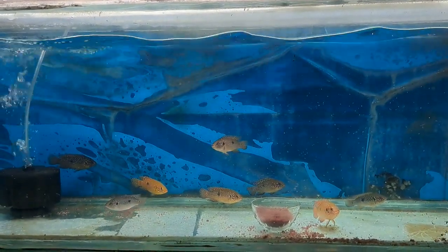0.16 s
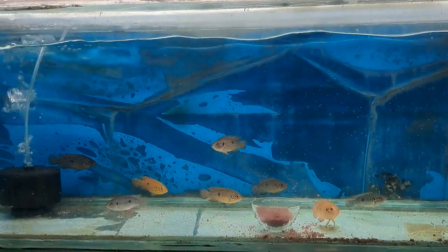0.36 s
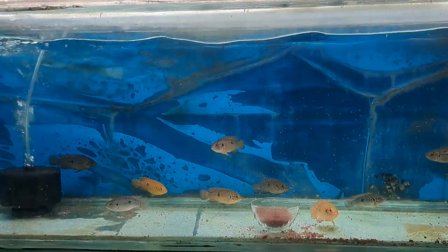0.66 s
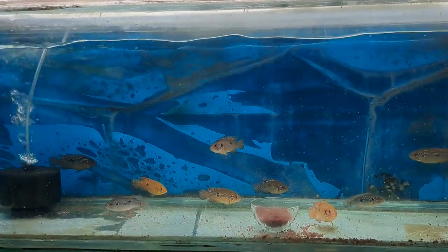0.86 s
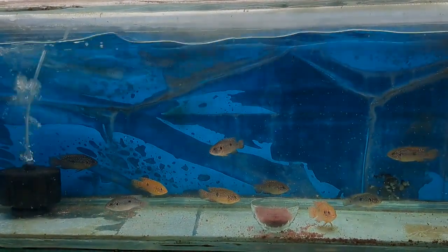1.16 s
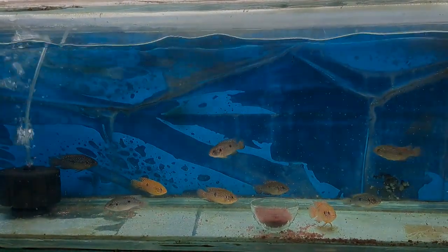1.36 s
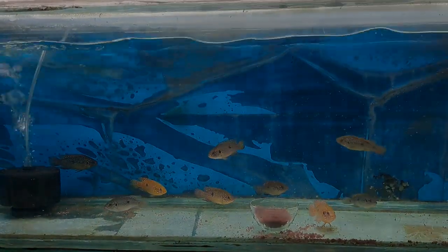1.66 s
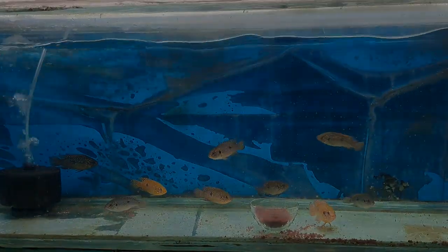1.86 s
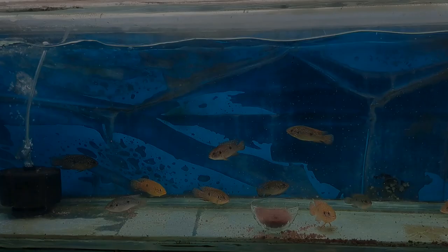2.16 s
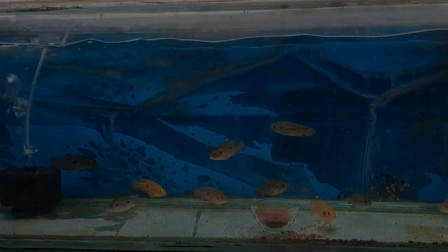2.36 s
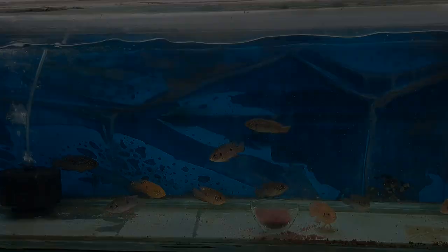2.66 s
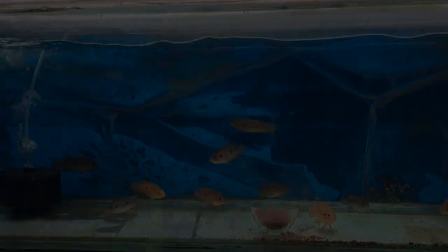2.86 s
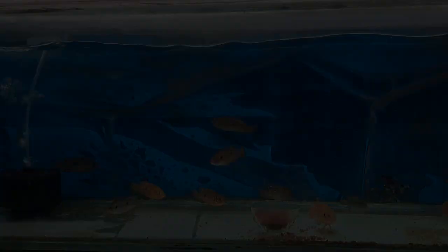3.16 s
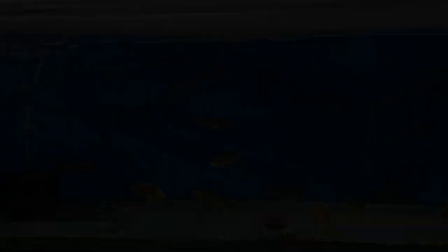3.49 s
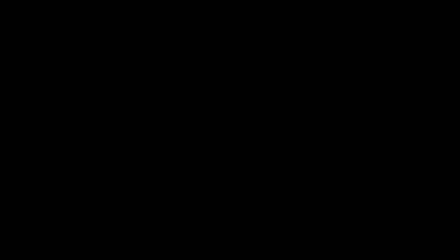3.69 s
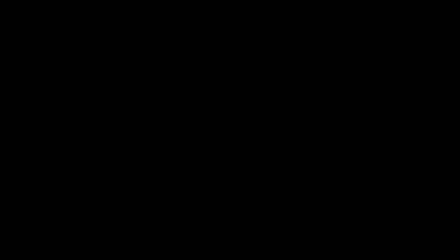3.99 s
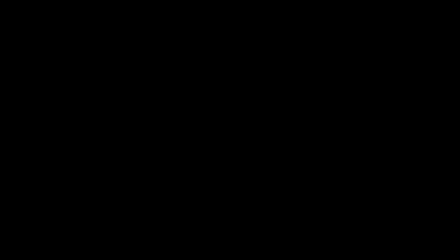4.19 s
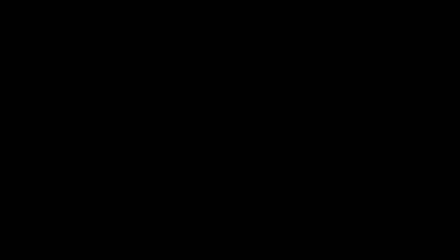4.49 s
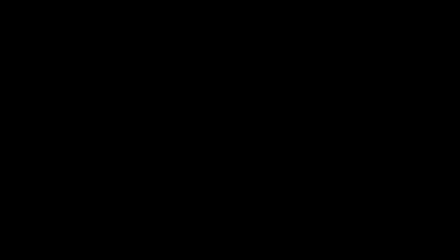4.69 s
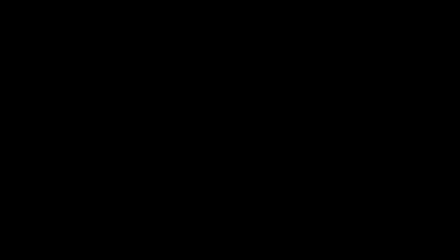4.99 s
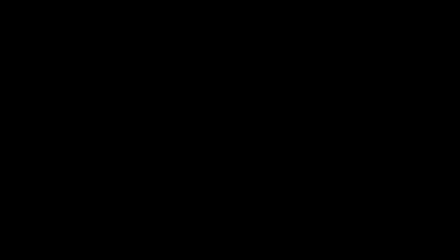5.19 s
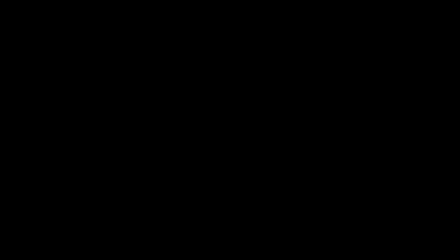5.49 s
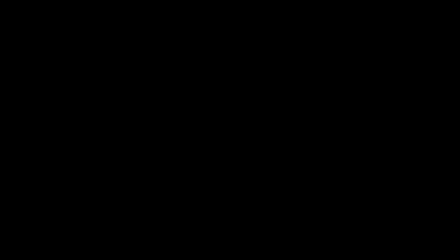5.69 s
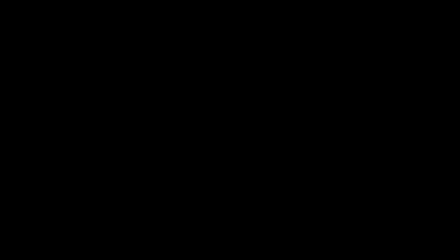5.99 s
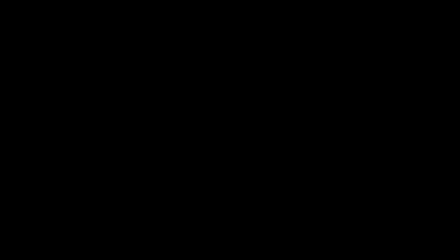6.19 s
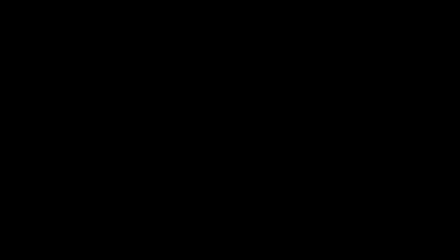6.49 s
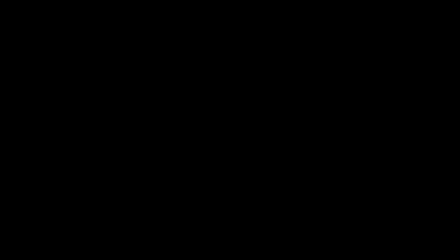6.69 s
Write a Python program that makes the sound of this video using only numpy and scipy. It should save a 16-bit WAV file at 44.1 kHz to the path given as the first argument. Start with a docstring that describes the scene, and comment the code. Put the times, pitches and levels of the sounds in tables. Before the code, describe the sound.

Air bubbles gurgle and splash at an aquarium's surface in uneven surges, popping and puffing close to the microphone, then calming in a quiet room.

```python
"""Aquarium in a quiet room: air from a sponge filter breaks at the surface, close to a stereo microphone.
Large bubbles gurgle all the time; again and again the water surges and splashes in small bubbles and spray.
Each bubble is a decaying sine of rising pitch; the finest foam is shaped noise. Single pops and ticks join in.
The biggest bursts puff air at the microphone, and large air pockets glug.
Random echoes give the glass tank a short ring and the room a longer, duller one."""
import sys
import numpy as np
from scipy import signal
from scipy.fft import rfft, irfft
from scipy.io import wavfile
from scipy.ndimage import uniform_filter1d

SR = 44100
rng = np.random.default_rng(int(sys.argv[2]) if len(sys.argv) > 2 else 0)


def waveform_to_disk(signal):
    """Save audio, clipped to [-1, 1], as 16-bit WAV at the path in sys.argv[1]."""
    frames = np.transpose(np.atleast_2d(signal))
    scaled = np.clip(frames, -1, 1) * 32767
    samples = np.round(scaled).astype(np.int16)
    wavfile.write(sys.argv[1], SR, samples)


N = 302085   # length [samples]


def from_db(db):
    """Decibels to amplitude gain."""
    return 10 ** (np.asarray(db) / 20)


def in_time(rows):
    """Each column of a (time, value, ...) curve at every sample."""
    s, *columns = np.transpose(rows)
    return [np.interp(np.arange(N) / SR, s, column) for column in columns]


def at_hz(points, hz):
    """Read a spectrum on a log-frequency axis."""
    known, level = np.transpose(points)
    return np.interp(np.log(hz + 1e-9), np.log(known), level)


def panned(pan_db):
    """Left and right gains of constant total power; positive is left."""
    gains = from_db(np.array([[.5], [-.5]]) * pan_db)
    return gains / np.sqrt(np.mean(gains ** 2, axis=0))


def add(out, s, sound):
    """Mix a short stereo sound in at time s."""
    start = min(max(int(s * SR), 0), N)
    out[:, start:start + sound.shape[1]] += sound[:, :N - start]


def noise(spectrum):
    """Coloured noise, unrelated in the two channels; rms 1."""
    white = rfft(rng.standard_normal((2, N)))
    hz = np.arange(white.shape[1]) * SR / N
    coloured = irfft(white * from_db(at_hz(spectrum, hz)), N)
    return coloured / coloured.std()


def clusters(per_s):
    """Bubbles reach the surface in uneven bunches: a random swing of spread near 1, per_s knots a second."""
    knots = rng.standard_normal(2000)
    swing = np.interp(np.arange(N) / SR * per_s, np.arange(len(knots)), knots)
    return np.sqrt(3 / 2) * swing   # interpolation had narrowed the spread


def scattered(count):
    """Random times [samples], one in each of count equal slots: the air supply is even; and random sizes 0..1."""
    when, size = rng.random((count, 2)).T
    return (np.arange(count) + when) / count * (N - 1), size


def pitches_of(sizes, size):
    """Spread sizes 0..1 evenly in octaves over the pitch range of a table."""
    return sizes[0][0] * (sizes[-1][0] / sizes[0][0]) ** size


# the still room: (frequency [Hz], relative density [dB per Hz])
ROOM_TONE_SPECTRUM = [(15, 12.5), (60, 6), (300, -2), (1500, -15.5), (4000, -24), (10000, -21),
                      (20000, -54)]


def room_tone(level_db=-79.5):
    """Steady, mostly low noise of the still room."""
    return from_db(level_db) * noise(ROOM_TONE_SPECTRUM)


def echoes(x, t60, wet_db, dull_hz, crossover):
    """Dense dying reflections, steeply dulled so that snaps stay dry; a share of each side crosses over."""
    t = np.arange(SR // 2) / SR
    first_echo_s = .002
    tail = rng.standard_normal((2, len(t))) * from_db(-60 * t / t60) * (t > first_echo_s)
    tail /= np.sqrt(np.sum(tail ** 2, axis=1, keepdims=True))
    tail = signal.sosfilt(signal.butter(4, dull_hz, fs=SR, output="sos"), tail)
    crossed = x + crossover * x[::-1]
    return from_db(wet_db) * signal.oaconvolve(crossed, tail, axes=1)[:, :N]


def eddies(puff_eddy_db=-34, glug_eddy_db=-12.0, fall_db_per_s=154.5):
    """Stereo gain of the air that swirls on after each puff and each glug, dying exponentially."""
    out = np.zeros((2, N))
    dying = from_db(-fall_db_per_s * np.arange(SR // 2) / SR)
    for s, peak_db, _, pan_db in AIR_PUFFS:
        add(out, s, from_db(peak_db + puff_eddy_db) * dying * panned(pan_db))
    for s, peak_db, _, _, pan_db in POCKET_GLUGS:
        add(out, s, from_db(peak_db + glug_eddy_db) * dying * panned(pan_db))
    return out


# air stirred at the microphone: (frequency [Hz], relative density [dB per Hz])
STIRRED_AIR_SPECTRUM = [(10, -7.5), (25, 2.5), (60, -1), (130, -6.5), (190, 2), (300, -48), (700, -17.5)]


def stirred_air(level_db, draught_db=-11, lumps_db=1.5):
    """A low, lumpy draught from the bursting surface reaches the microphone, with the eddies."""
    lumps = lumps_db * np.tanh(clusters(per_s=51))
    draught = from_db(level_db + draught_db + lumps) * panned(2.2)
    air = noise(STIRRED_AIR_SPECTRUM) * (draught + eddies())
    return signal.sosfilt(signal.butter(2, 1200, fs=SR, output="sos"), air)


# low glugs of large air pockets:
# (time of full swing [s], peak [dB], pitch at full swing [Hz], half length [s], left-right [dB])
POCKET_GLUGS = [(3.352, -21.5, 157, 0.0042, 27), (3.388, -35, 137, 0.015, 14),
                (3.418, -35, 157.3, 0.0097, 20), (3.523, -37, 118, 0.0086, 29),
                (3.673, -39.5, 210, 0.0067, -1), (4.574, -38.5, 126, 0.0061, 30),
                (5.953, -51, 292, 0.013, -2), (6.003, -49, 224, 0.0085, 2)]


def glugs(rise_octaves_per_s=20.0):
    """A large pocket wobbles for a few slow cycles, swelling and fading, its pitch rising as it drains."""
    out = np.zeros((2, N))
    t = np.arange(-SR // 20, SR // 20) / SR
    for s, peak_db, hz, half_s, pan_db in POCKET_GLUGS:
        phase = 2 * np.pi * np.cumsum(hz * 2 ** (rise_octaves_per_s * t)) / SR
        wobble = np.sin(phase) * np.exp(-(t / half_s) ** 2)
        add(out, s + t[0], from_db(peak_db) * panned(pan_db) * wobble)
    return out


# puffs of air from large bursts: (time of mid swing [s], peak [dB], centre [Hz], left-right [dB])
AIR_PUFFS = [(0.229, -37, 141, 1), (0.9181, -14, 219, 19), (1.2442, -38.5, 208, 4), (1.273, -43, 130, 8),
             (1.51, -39, 151, 21), (2.2648, -32, 202, 10), (2.4257, -17.5, 313, -6.5),
             (2.919, -47, 146, -16), (3.566, -31.5, 260, 33), (3.6346, -27.5, 154, 18),
             (4.245, -49, 79, 37), (5.107, -21, 370, 22), (5.11, -16, 196, 31), (5.134, -27, 127, 35),
             (5.192, -35, 238, 26), (5.247, -39.5, 166, 29), (5.5767, -17.5, 228, 29.5),
             (5.611, -41.5, 128, 35)]


def puffs():
    """A large burst sends one swing of pressure to the microphone: suction, then a push."""
    out = np.zeros((2, N))
    t = np.arange(-SR // 100, SR // 100) / SR
    for s, peak_db, hz, pan_db in AIR_PUFFS:
        phase = 2 * np.pi * hz * t
        swing = phase * np.exp((1 - phase ** 2) / 2)
        add(out, s + t[0], from_db(peak_db) * panned(pan_db) * swing)
    return out


def bubble(hz, t60, lag_s, rise, swell):
    """An air pocket swells into ringing and dies, its pitch rising near the surface; the sides hear it lag_s apart."""
    t60 = max(t60, 2 / hz, .002)   # at least two cycles and 2 ms
    t = np.arange(int((t60 + abs(lag_s)) * SR) + 2) / SR
    age_s = np.maximum(t - np.maximum([[lag_s], [-lag_s]], 0), 0)
    attack_s = 0.18 / hz + abs(swell) * t60   # short pops snap, long rings start softly
    swing = (1 - np.exp(-(age_s / attack_s) ** 2)) * np.exp(-np.log(1000) * age_s / t60)
    cycles = hz * age_s * (1 + rise * (age_s / t60 - .5) / 2)   # pitch gains the share "rise" over t60
    return swing / swing.max() * np.sin(2 * np.pi * cycles)


def swarm(sizes, stretch, count, cycles, spread_db, width_db, lag_s, rise, swell):
    """Many small bubbles at random times, pitches and places, level near 1; stretch scales pitch over time."""
    out = np.zeros((2, N))
    when, size = scattered(count)
    strength, damping, place, lag = np.clip(rng.standard_normal((count, 4)), -2, 2).T
    pitches = pitches_of(sizes, size)
    gains = from_db(at_hz(sizes, pitches) + spread_db * strength) * panned(width_db * place)
    pitches = pitches * stretch[when.astype(int)]
    rings_s = cycles * 2 ** (damping / 2) / pitches
    for k in range(count):
        sound = bubble(pitches[k], rings_s[k], lag_s * lag[k], rise, swell)
        add(out, when[k] / SR, gains[:, k, None] * sound)
    # even out the level so that the caller alone shapes it
    power = np.mean(out ** 2, axis=0)
    power = uniform_filter1d(uniform_filter1d(power, size=3000), size=3000)
    return out / np.sqrt(np.abs(power) + 1e-9)


# the surface heaves and splashes: (time at full strength [s], relative splash level [dB], hold [s],
# rise [dB/s], fall [dB/s], spray against splash [dB], left-right [dB])
SURFACE_SURGES = [(0.0, -37.5, 0.33, 60, 29.5, -21, 5), (0.555, -57, 0.092, 149, 73, -17.5, 5),
                  (0.874, -46.5, 0.048, 27, 46, -25.5, -3.5), (1.711, -46.5, 0.093, 85, 135, -20, -5),
                  (1.902, -37, 0.055, 248, 146, -13, -1.5), (2.038, -35.5, 0.23, 198.5, 134, -20.5, 5),
                  (2.351, -31.5, 0.081, 144.5, 155, -19, 8), (2.83, -49.5, 0.025, 158, 30, -18, -19),
                  (3.137, -50, 0.22, 70, 91, -26, -11), (3.38, -34, 0.02, 103, 41.5, -11.5, -1.5),
                  (4.324, -63.5, 0.033, 120, 120, -15.5, 9), (4.576, -52, 0.13, 102, 96, -16.5, 2),
                  (4.807, -38.5, 0.098, 67.5, 95, -15.5, 5.5), (5.051, -38.5, 0.0066, 203, 121, -12, -1.5),
                  (5.515, -59, 0.21, 91, 97.5, -19.5, 2), (6.162, -54.5, 0.022, 120, 110, -24.5, 3),
                  (6.347, -60, 0.11, 155, 117, -14, -9), (6.82, -53, 0.03, 253, 107, -14.5, -15)]
FOAM_DB, FOAM_FALL_DB_PER_S = -17, 22.5   # the patter that a surge leaves behind
CALM_SPLASH_DB, CALM_SPRAY_DB = -59, -114   # floor between surges, relative
SPRAY_STEEPNESS = 1.83   # dB of spray for each dB of surge
# rough water tears air into smaller, higher bubbles just ahead of a surge; then they grow large again
CALM_PITCH, SURGE_OCTAVES, TEAR_LEAD_S, TEAR_S, SETTLE_S = 0.9186, 0.51, 0.25, 0.21, 0.62
TEAR_FOLLOWS = 0.5   # weak surges tear the air less: dB of tearing for each dB of surge


def surface():
    """Surges swell, hold and collapse into foam: stereo splash gain, spray gain and gurgle pitch factor."""
    t = np.arange(N) / SR
    strongest_db = max(row[1] for row in SURFACE_SURGES)
    # splash and spray add up as power
    splash, spray, torn = from_db(CALM_SPLASH_DB) ** 2, from_db(CALM_SPRAY_DB) ** 2, 0
    for s, db, hold_s, rise, fall, spray_db, pan_db in SURFACE_SURGES:
        before_s, after_s = np.maximum(s - t, 0), np.maximum(t - s - hold_s, 0)
        foam_db = FOAM_DB - FOAM_FALL_DB_PER_S * after_s
        shape_db = -rise * before_s + np.maximum(-fall * after_s, foam_db)
        splash = splash + (from_db(db + shape_db) * panned(pan_db)) ** 2
        spray = spray + from_db(db + spray_db + SPRAY_STEEPNESS * shape_db) ** 2
        age_s = t - s + TEAR_LEAD_S
        tearing = np.exp(-(age_s / np.where(age_s < 0, TEAR_S, SETTLE_S)) ** 2)
        torn = np.maximum(torn, from_db(TEAR_FOLLOWS * (db - strongest_db)) * tearing)
    return np.sqrt(splash), np.sqrt(spray), CALM_PITCH * 2 ** (SURGE_OCTAVES * torn)


# spray by pitch: (pitch [Hz], relative strength [dB])
SPRAY_BY_PITCH = [(3300, 11), (4600, -15.5), (5700, -2.5), (6700, -18), (8000, -9.5), (10500, -39)]
# foam bursting too finely to tell apart: (frequency [Hz], relative density [dB per Hz])
FIZZ_SPECTRUM = [(1500, -37.5), (2800, 20), (3600, 7), (4700, 2), (6500, 2.5), (8500, -10), (11000, -25)]


def spatter(spray_gain, ragged_db=3.0):
    """Spray of tiny bubbles and fizz flies in ragged little bursts of its own."""
    drops = swarm(SPRAY_BY_PITCH, np.ones(N), count=1500, cycles=27,
                  spread_db=7.5, width_db=15.5, lag_s=.0003, rise=0.056, swell=0.19)
    spray = from_db(-5.0) * drops + from_db(-1.0) * noise(FIZZ_SPECTRUM)
    return spray * spray_gain * from_db(ragged_db * clusters(per_s=130))


def droplets(surface_db, count=100, peak_db=-49.0, follows=1.23, cycles=38, spread_db=4.5, width_db=23.0):
    """Lone spray-sized bubbles burst near the microphone now and then, harder when the surface is rough."""
    out = np.zeros((2, N))
    when, size = scattered(count)
    strength, damping, place = np.clip(rng.standard_normal((count, 3)), -1.5, 1.5).T
    pitches = pitches_of(SPRAY_BY_PITCH, size)
    roughness_db = surface_db[when.astype(int)] - surface_db.max()
    level_db = peak_db + follows * roughness_db + spread_db * strength
    gains = from_db(level_db + at_hz(SPRAY_BY_PITCH, pitches)) * panned(width_db * place)
    for k, hz in enumerate(pitches):
        ring_s = cycles * 2 ** (damping[k] / 2) / hz
        add(out, when[k] / SR, gains[:, k, None] * bubble(hz, ring_s, 0, rise=0.012, swell=0.061))
    return out


# small splashing bubbles by pitch, before the water refines them: (pitch [Hz], relative strength [dB])
SPLASH_BY_PITCH = [(900, -11), (1200, -8.5), (1500, -3.5), (1780, -4), (2150, -6), (2550, -12), (2900, -10)]


def splashing(splash_gain, splash_db):
    """Small bubbles follow the surges; rougher water tears the air into smaller, higher ones."""
    fineness = 2 ** (0.01665 * (splash_db - splash_db.max()) + 0.095)
    splash = swarm(SPLASH_BY_PITCH, fineness, count=3800, cycles=32.2,
                   spread_db=3.0, width_db=10.5, lag_s=0.000551, rise=0.14, swell=0.037)
    return splash * splash_gain * from_db(0.8)


# large bubbles by pitch, before the surges shift them: (pitch [Hz], relative strength [dB])
GURGLE_BY_PITCH = [(200, -8.5), (260, -9), (340, -4), (500, 2.5), (720, 5.5), (1000, 1.5)]
# strength of the air flow: (time [s], relative level [dB])
AIR_FLOW = [(0.0, -44), (0.68, -50), (0.88, -47), (1.75, -47), (2.08, -42.5), (2.44, -45), (2.98, -56.5),
            (3.28, -57.5), (3.42, -44.5), (3.66, -45.5), (4.23, -58.5), (4.96, -51.5), (5.17, -54.5),
            (5.57, -54.5), (5.74, -53.5), (5.86, -56), (6.06, -53.5), (6.26, -57), (6.45, -58),
            (6.85, -63.5)]
# where the large bubbles break: (time [s], left-right [dB])
GURGLE_PLACE = [(0.0, 15), (0.04, 49), (0.15, 3), (0.3, 0.5), (2.73, -3), (2.78, -12.5), (3.26, -42),
                (3.3, 0), (6.81, 2), (6.85, 5)]


def gurgling(flow_db, pitch_factor):
    """Large bubbles break all the time, as strong as the air flow, their place moving from side to side."""
    pan_db, = in_time(GURGLE_PLACE)
    gurgle = swarm(GURGLE_BY_PITCH, pitch_factor, count=2200, cycles=21.5,
                   spread_db=2.0, width_db=0.5, lag_s=0.00035, rise=0.17, swell=0.048)
    return gurgle * from_db(flow_db + 4) * panned(pan_db)


def shed_fizz(bursts, level_db=-32.0, linger_s=0.0036, above_hz=2300):
    """The film of each sharp, high pop shatters into a brief fizz in proportion; deep plops shed next to none."""
    keep = np.exp(-1 / (linger_s * SR))
    high_pass = signal.butter(2, above_hz, "high", fs=SR, output="sos")
    sharp = signal.sosfilt(high_pass, bursts + 1e-18)
    power = signal.lfilter([1 - keep], [1, -keep], sharp ** 2 + 1e-18)
    return from_db(level_db) * np.sqrt(power) * noise(FIZZ_SPECTRUM)


# single bubbles and pops, loud or faint, and short high ticks:
# (time [s], peak [dB], pitch [Hz], time to fall 60 dB [s], left-right [dB])
SINGLE_BUBBLES = [(0.026, -27.5, 3070, 0.0068, 35), (0.027, -18.5, 1820, 0.01, 28),
                  (0.0379, -20, 673, 0.019, 33), (0.044, -24, 1733, 0.031, 30),
                  (0.0517, -39, 9700, 0.0038, 30), (0.1085, -32, 2320, 0.027, 31),
                  (0.126, -23, 1780, 0.012, -18), (0.156, -26.5, 2150, 0.013, 14),
                  (0.206, -44, 5650, 0.007, -33), (0.2144, -26.5, 6130, 0.006, -39),
                  (0.2293, -24.5, 1730, 0.0098, -8), (0.23, -23.5, 630, 0.015, 3),
                  (0.2335, -31.5, 2360, 0.026, 18), (0.2435, -18.5, 1635, 0.017, -24),
                  (0.319, -22, 920, 0.0082, -18), (0.3182, -16, 1690, 0.02, -24),
                  (0.3209, -31.5, 360, 0.018, 11), (0.322, -41.5, 3580, 0.0093, 23),
                  (0.395, -49, 4260, 0.0042, 32), (0.424, -35, 1775, 0.033, 7),
                  (0.4455, -25.5, 800, 0.034, -15), (0.448, -27, 392, 0.016, -3),
                  (0.459, -24, 1550, 0.02, 11), (0.4944, -60, 6900, 0.089, -20),
                  (0.5136, -30, 1560, 0.013, -13), (0.5527, -51, 3300, 0.012, 24),
                  (0.646, -48.5, 3390, 0.01, 28), (0.647, -35, 1860, 0.028, 27),
                  (0.7275, -32.5, 2070, 0.0095, 20), (0.775, -27.5, 1330, 0.0076, -16),
                  (0.773, -49, 2980, 0.011, -33), (0.885, -31.5, 1470, 0.048, -12),
                  (0.96, -45, 2170, 0.012, 17), (1.01, -31, 566, 0.021, -2),
                  (1.0603, -27.5, 1366, 0.017, -18), (1.069, -28, 1440, 0.014, -4),
                  (1.221, -37, 1350, 0.02, 6), (1.272, -37.5, 1930, 0.016, -3),
                  (1.3015, -62, 5440, 0.0066, 24), (1.312, -56, 5300, 0.009, 26),
                  (1.312, -49, 2910, 0.011, 21), (1.3345, -31.5, 693, 0.018, 3),
                  (1.4224, -47.5, 8890, 0.0026, 32), (1.5038, -29, 432, 0.042, 1),
                  (1.514, -42, 1790, 0.018, 19), (1.6907, -23, 4200, 0.0024, -5),
                  (1.6906, -21, 1970, 0.0031, -7), (1.7522, -23, 459, 0.03, 1),
                  (1.7567, -25, 1230, 0.012, -3), (1.7785, -28.5, 1110, 0.026, -16),
                  (1.7978, -28.5, 1434, 0.022, -14), (1.808, -43, 7660, 0.003, 31),
                  (1.8185, -20, 816, 0.024, -10), (1.893, -23.5, 1290, 0.047, -5),
                  (1.9043, -12, 1150, 0.0064, -8.5), (1.912, -36.5, 8890, 0.002, 21),
                  (1.925, -21, 2510, 0.019, -35), (1.9267, -25.5, 3150, 0.0093, -29),
                  (1.9284, -11, 1520, 0.016, 0), (1.931, -33, 7230, 0.0034, -32),
                  (1.9429, -25.5, 5970, 0.0017, 22), (1.946, -40, 3920, 0.006, -33),
                  (1.954, -56, 9550, 0.081, -30), (2.022, -23, 1520, 0.017, -4),
                  (2.041, -21, 1510, 0.022, -6), (2.06, -26, 777, 0.032, 3), (2.063, -18, 1430, 0.025, 4.5),
                  (2.0896, -16.5, 1635, 0.021, -18), (2.092, -33.5, 6680, 0.0057, -29),
                  (2.0988, -16, 1710, 0.029, 28), (2.098, -33.5, 3250, 0.008, 25),
                  (2.1187, -26.5, 6740, 0.0026, -18), (2.1373, -15.5, 2130, 0.016, -34),
                  (2.16, -43, 6660, 0.005, 32), (2.182, -31, 6360, 0.0028, -36),
                  (2.167, -15, 1187, 0.032, 29), (2.1688, -17, 2470, 0.0035, 23.5),
                  (2.1926, -6, 1760, 0.0058, -23), (2.1987, -29.5, 6560, 0.004, 15),
                  (2.2055, -17.5, 1750, 0.036, 8), (2.2205, -22, 810, 0.011, -20),
                  (2.2318, -11.5, 1340, 0.0065, -13.5), (2.2511, -16.5, 1636, 0.016, 15),
                  (2.2718, -22.5, 2250, 0.0018, 25.5), (2.339, -37, 3300, 0.0095, 30.5),
                  (2.3647, -6, 1840, 0.0043, 30), (2.3776, -21.5, 1990, 0.018, 30),
                  (2.3787, -20, 700, 0.0074, 27), (2.3843, -16.5, 1580, 0.016, 30),
                  (2.39, -14.5, 1320, 0.013, 30), (2.4083, -13.5, 1400, 0.01, 32),
                  (2.4245, -15, 1340, 0.0051, -7), (2.425, -22.5, 860, 0.0035, 2),
                  (2.4432, -24, 3650, 0.0021, -6), (2.443, -10, 1450, 0.0059, -22),
                  (2.4436, -15.5, 586, 0.0025, -7), (2.463, -23, 344, 0.0092, -26),
                  (2.4644, -23, 1470, 0.0086, -17), (2.4634, -42, 7160, 0.0039, -35),
                  (2.648, -39.5, 690, 0.055, 13), (2.711, -33, 1830, 0.017, 24),
                  (2.7205, -28, 1620, 0.0055, -14), (2.7268, -46, 5850, 0.0057, -23),
                  (2.7595, -32.5, 2850, 0.0078, 28), (2.759, -27, 1940, 0.0094, 28),
                  (2.7595, -44, 5130, 0.0013, 27), (2.7972, -40, 620, 0.1, -23),
                  (2.836, -50, 7700, 0.0018, 31), (2.869, -38, 2340, 0.0089, 33),
                  (2.8905, -35.5, 830, 0.044, -29), (2.8905, -43.5, 2760, 0.01, 26),
                  (3.058, -59, 6200, 0.01, 20), (3.1095, -30, 1220, 0.016, -19),
                  (3.125, -33.5, 1480, 0.033, 19), (3.133, -33.5, 2100, 0.014, 4),
                  (3.2433, -28.5, 800, 0.043, -28), (3.2528, -27, 1800, 0.0037, -3),
                  (3.285, -29, 1730, 0.0077, 1), (3.3006, -23.5, 2130, 0.0041, 21),
                  (3.3721, -17.5, 760, 0.0035, 4.5), (3.3709, -8, 1720, 0.01, -25),
                  (3.372, -28.5, 5300, 0.004, -24), (3.3723, -36.5, 8800, 0.0027, -28),
                  (3.392, -19, 2310, 0.014, 23), (3.406, -31.5, 7300, 0.0018, -28),
                  (3.4138, -23, 1550, 0.01, -24), (3.4346, -29.5, 2580, 0.0067, 26),
                  (3.441, -21, 1860, 0.017, -27), (3.4685, -43, 6040, 0.0061, -25),
                  (3.517, -30, 2530, 0.021, -34), (3.525, -37.5, 3630, 0.018, -29),
                  (3.5683, -23, 1940, 0.0033, 9), (3.5796, -44.5, 8900, 0.0018, -32),
                  (3.5791, -19.5, 2000, 0.0062, 19), (3.6116, -41.5, 7040, 0.0048, -35),
                  (3.6825, -50, 6200, 0.005, -35), (3.683, -33, 2120, 0.017, -12),
                  (3.859, -27, 1310, 0.0072, -2.5), (3.9192, -33.5, 685, 0.021, 0),
                  (3.946, -40.5, 1890, 0.025, 32), (4.0304, -42.5, 534, 0.081, -2),
                  (4.172, -30.5, 1415, 0.014, 11), (4.2276, -35.5, 1340, 0.015, 6),
                  (4.249, -40.5, 1550, 0.02, 17), (4.3597, -47, 1872, 0.018, 23),
                  (4.5694, -34.5, 2090, 0.0075, 25), (4.5692, -50, 5600, 0.0055, 26),
                  (4.691, -29.5, 1660, 0.02, 3), (4.708, -25.5, 1610, 0.019, -4),
                  (4.7074, -39.5, 6250, 0.0038, -13), (4.779, -28, 1630, 0.016, -4),
                  (4.7832, -22.5, 2120, 0.017, -8), (4.806, -42, 8950, 0.0018, -38),
                  (4.809, -20.5, 1470, 0.0017, 22), (4.818, -25.5, 880, 0.013, 11),
                  (4.8394, -24, 1840, 0.018, -5), (4.888, -18, 1170, 0.031, -6),
                  (4.9124, -43.5, 8400, 0.0026, 33), (4.9544, -24.5, 1540, 0.0053, 31),
                  (5.0312, -18, 1530, 0.0048, 17), (5.046, -17, 1770, 0.0037, 22),
                  (5.052, -47, 5000, 0.0074, 27), (5.1445, -43, 7640, 0.00097, 24),
                  (5.298, -61, 4400, 0.014, -17), (5.3032, -28.5, 1810, 0.013, -21),
                  (5.329, -34, 858, 0.062, 6), (5.3558, -45, 2730, 0.0065, 29),
                  (5.4906, -41.5, 1620, 0.013, -28), (5.524, -41.5, 441, 0.032, 0),
                  (5.586, -34, 1510, 0.007, 7), (5.6707, -54, 5470, 0.0038, 31),
                  (5.7317, -37, 434, 0.038, 0), (5.766, -36, 1740, 0.0051, 15),
                  (5.781, -51.5, 3350, 0.0073, 12), (5.824, -56, 6400, 0.002, 17.5),
                  (5.8898, -31.5, 786, 0.027, 10), (5.9261, -33.5, 747, 0.027, 8),
                  (6.028, -55, 2680, 0.012, 14), (6.3255, -40.5, 1380, 0.018, -15),
                  (6.344, -41, 2760, 0.0086, 20), (6.365, -44, 2325, 0.011, 18),
                  (6.4, -57.5, 5700, 0.011, 35), (6.4, -42, 1320, 0.027, -20),
                  (6.4638, -41, 1650, 0.0072, 12), (6.4773, -40, 2324, 0.0044, 29),
                  (6.602, -46, 2240, 0.0016, 11), (6.614, -36.5, 1670, 0.005, 6),
                  (6.702, -41, 1490, 0.0086, 7), (6.7435, -53, 2730, 0.0033, 15),
                  (6.7432, -55.5, 6400, 0.005, 33), (6.817, -45, 2450, 0.015, 17)]


def single_bubbles(lag_s=0.00033, rise=0.054, swell=0.038, daughter_db=-11, split_s=0.0031, split_octaves=0.11):
    """Single bubbles, pops and ticks ring at set times; each sheds a weaker one of nearly its size a moment later."""
    out = np.zeros((2, N))
    draws = np.clip(rng.standard_normal((len(SINGLE_BUBBLES), 3)), -1.5, 1.5)
    for (s, peak_db, hz, t60, pan_db), (lag, wait, size) in zip(SINGLE_BUBBLES, draws):
        gain = from_db(peak_db) * panned(pan_db)
        add(out, s, gain * bubble(hz, t60, lag_s * lag, rise, swell))
        daughter = bubble(hz * 2 ** (split_octaves * size), t60, -lag_s * lag, rise, swell)
        add(out, s + split_s * 2 ** (wait / 2), gain * from_db(daughter_db) * daughter)
    return out


def scene():
    """Three sizes of bubbles follow air flow and surging surface; tank and room answer."""
    flow_db, = in_time(AIR_FLOW)
    splash_gain, spray_gain, gurgle_pitch = surface()
    splash_db = 10 * np.log10(np.mean(splash_gain ** 2, axis=0))
    bubbling = gurgling(flow_db, gurgle_pitch) + splashing(splash_gain, splash_db) + spatter(spray_gain)
    bunch_db = 2.02 * clusters(per_s=50)   # each bunch bursts in all sizes at once
    bubbling = bubbling * from_db(bunch_db - 1.4)
    # reflections between the glass walls blur the swarm into a wash
    wash = echoes(bubbling, t60=0.059, wet_db=-7.5, dull_hz=2120, crossover=0.24)
    bursts = single_bubbles()
    water = bubbling + wash + droplets(splash_db) + bursts + shed_fizz(bursts)
    tank = echoes(water, t60=0.18, wet_db=-14.0, dull_hz=3200, crossover=0.23)
    room = echoes(water, t60=0.71, wet_db=-18.0, dull_hz=2140, crossover=0.77)
    air = stirred_air(flow_db + bunch_db) + puffs()
    return room_tone() + room + tank + air + glugs() + water


def record(dry, cutoff_hz=11500):
    """The top is cut steeply by an elliptic low-pass."""
    low_pass = signal.ellip(10, .2, 80, cutoff_hz, fs=SR, output="sos")
    return signal.sosfilt(low_pass, dry)


dry = scene()
out = record(dry)
waveform_to_disk(out)
```